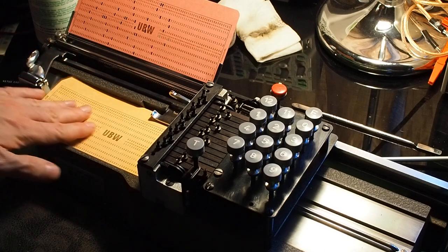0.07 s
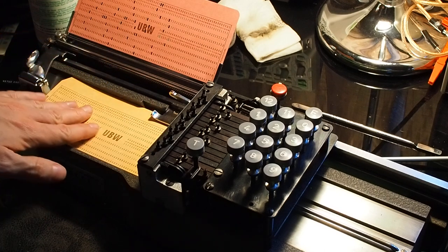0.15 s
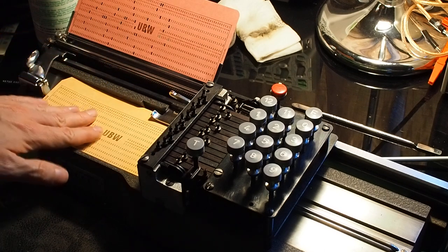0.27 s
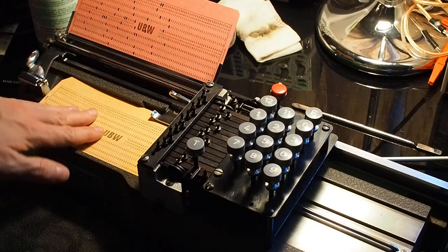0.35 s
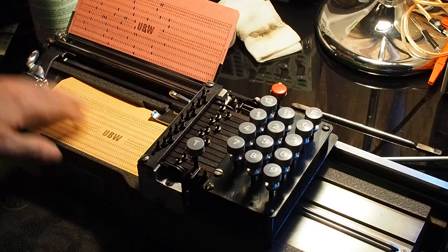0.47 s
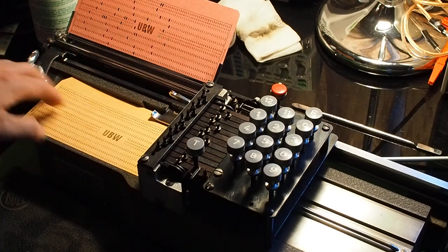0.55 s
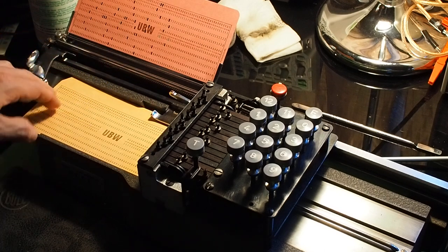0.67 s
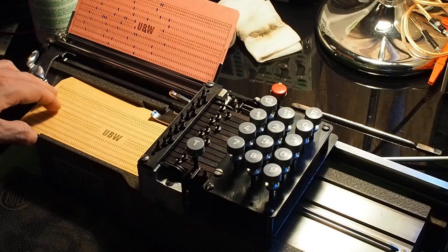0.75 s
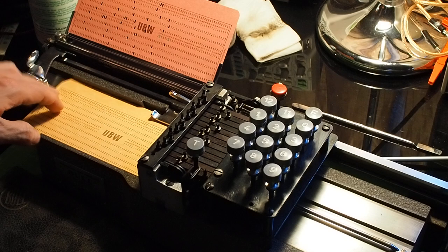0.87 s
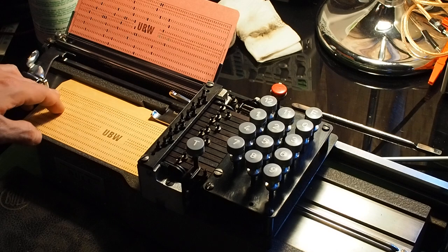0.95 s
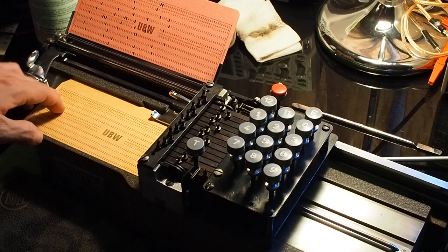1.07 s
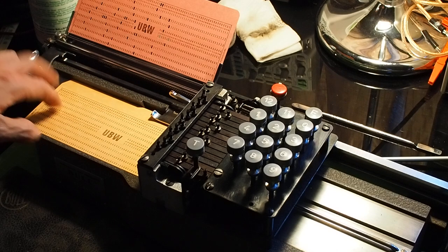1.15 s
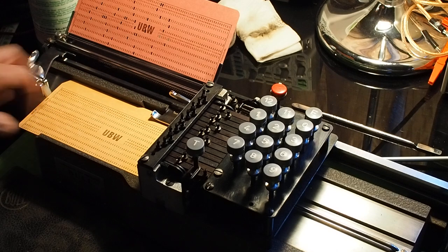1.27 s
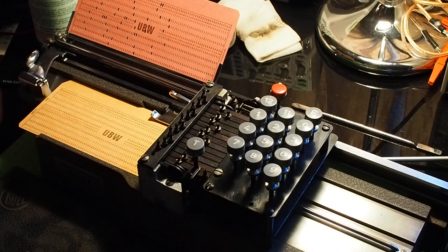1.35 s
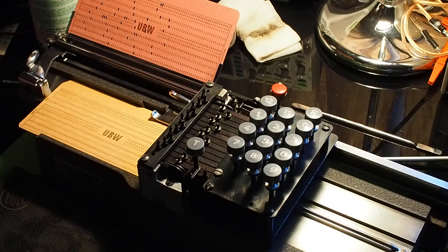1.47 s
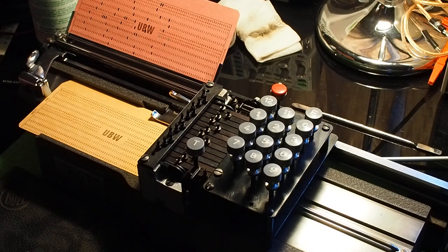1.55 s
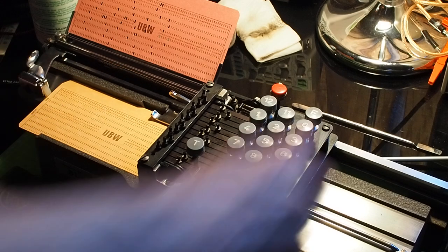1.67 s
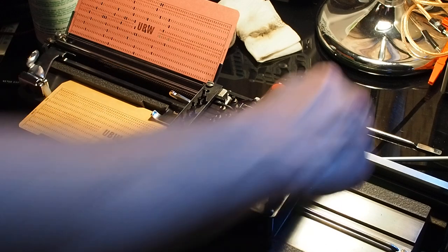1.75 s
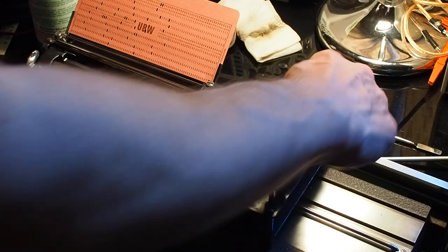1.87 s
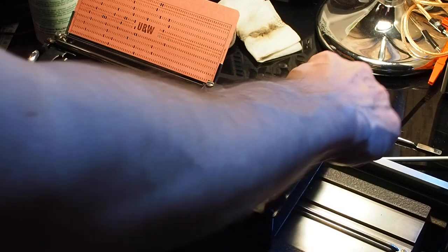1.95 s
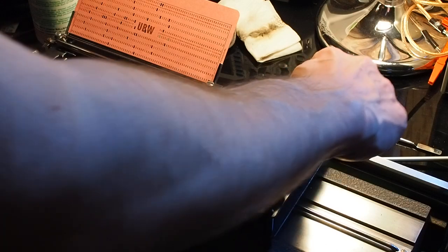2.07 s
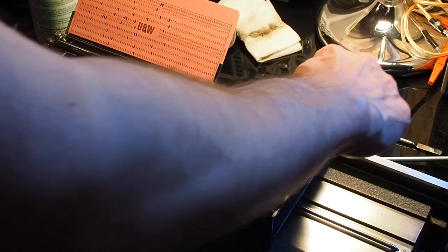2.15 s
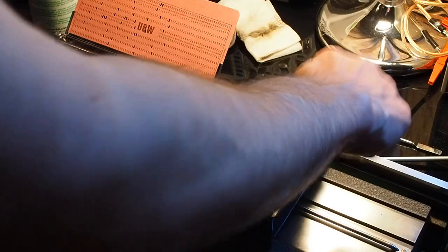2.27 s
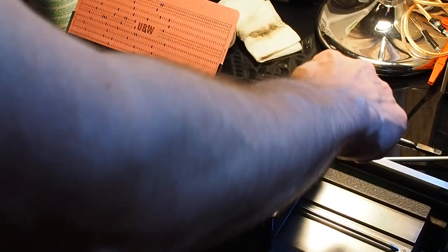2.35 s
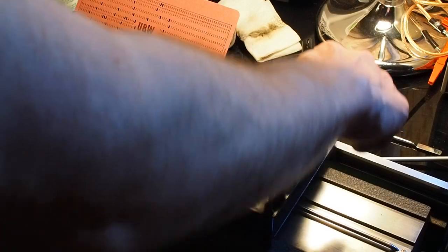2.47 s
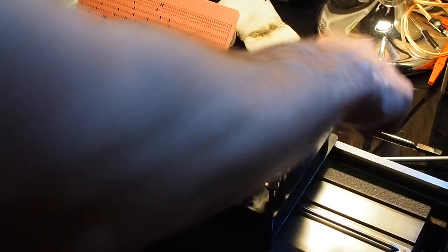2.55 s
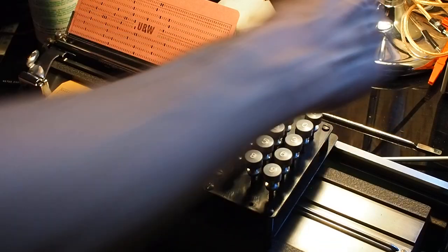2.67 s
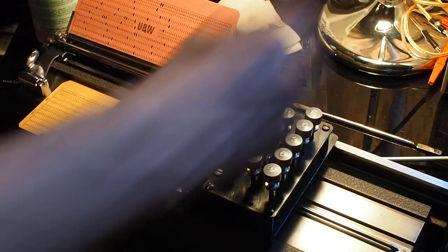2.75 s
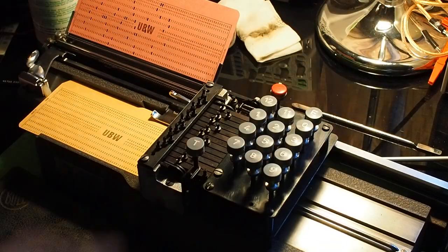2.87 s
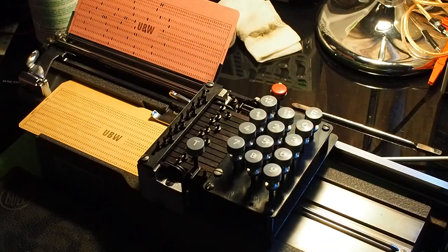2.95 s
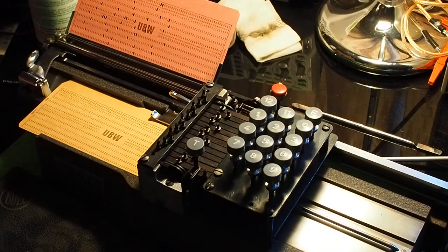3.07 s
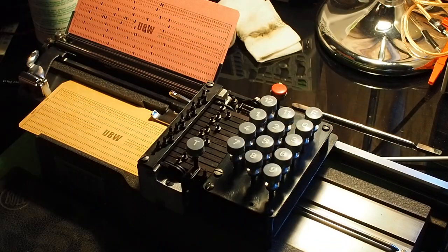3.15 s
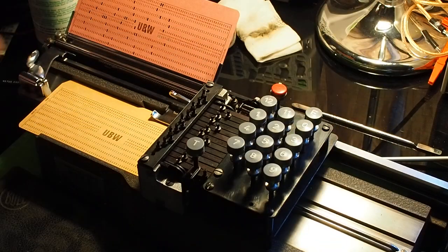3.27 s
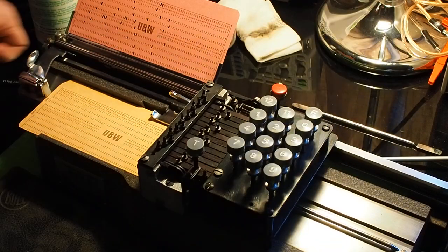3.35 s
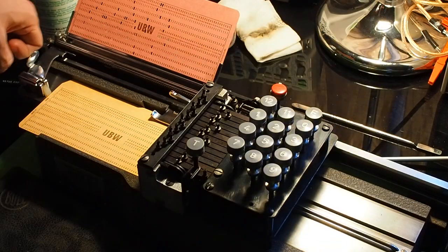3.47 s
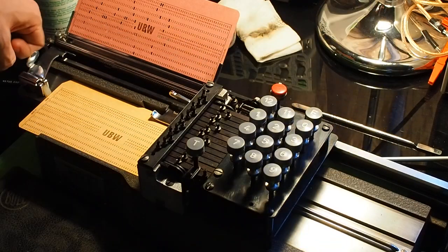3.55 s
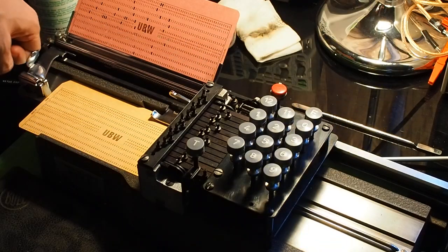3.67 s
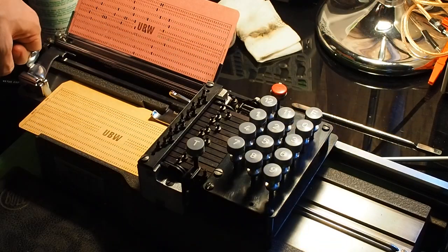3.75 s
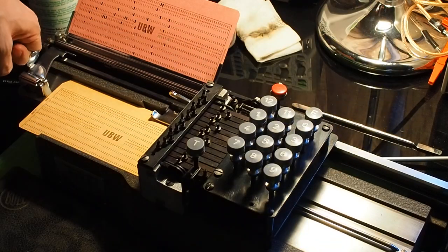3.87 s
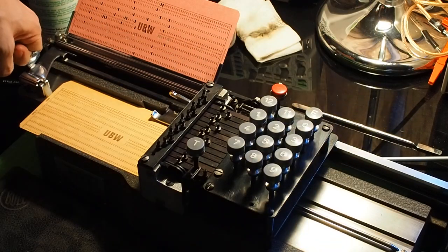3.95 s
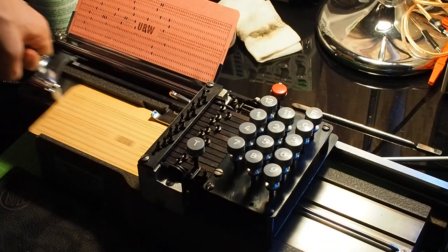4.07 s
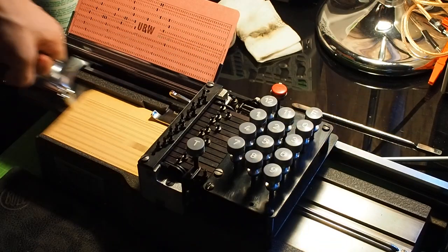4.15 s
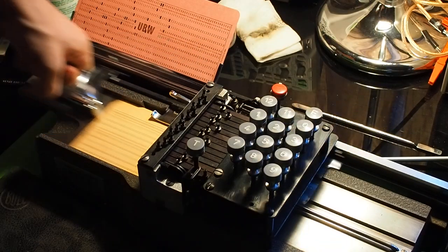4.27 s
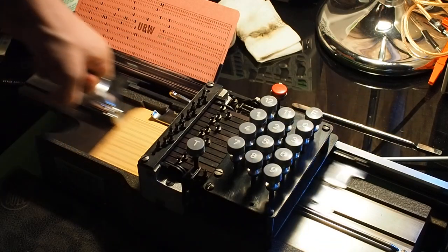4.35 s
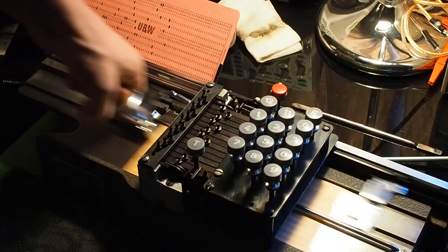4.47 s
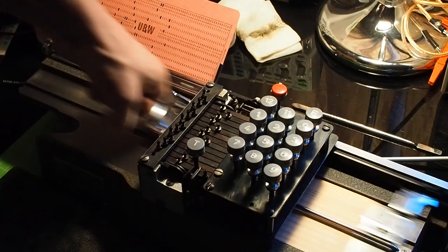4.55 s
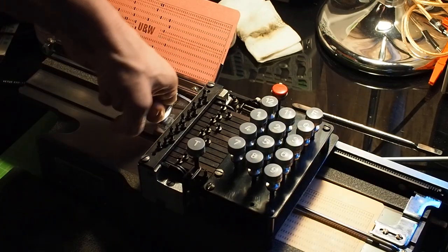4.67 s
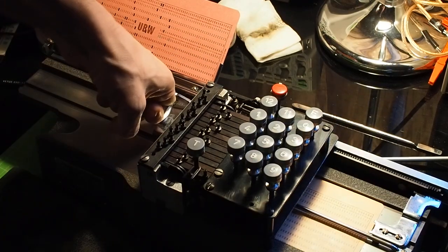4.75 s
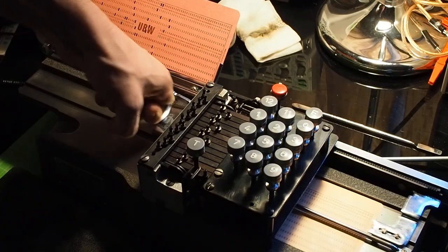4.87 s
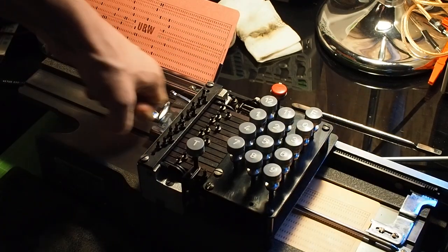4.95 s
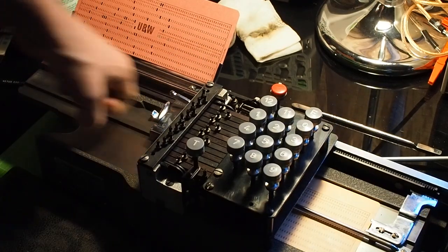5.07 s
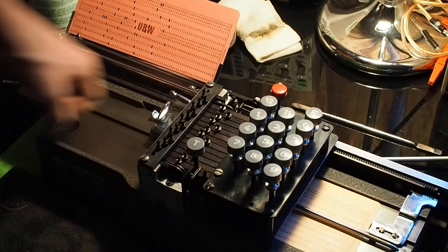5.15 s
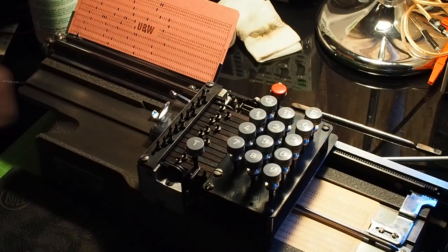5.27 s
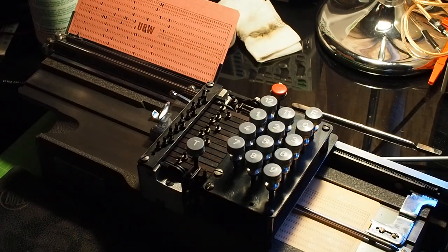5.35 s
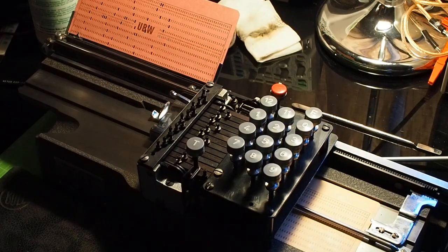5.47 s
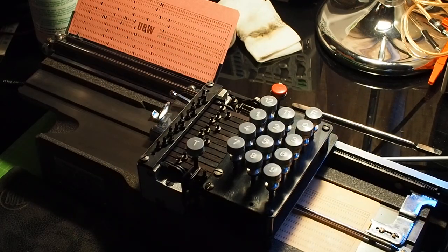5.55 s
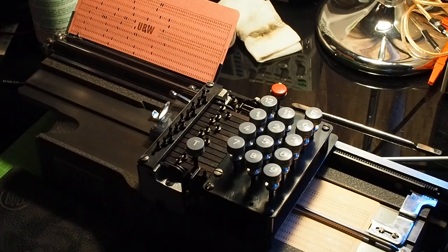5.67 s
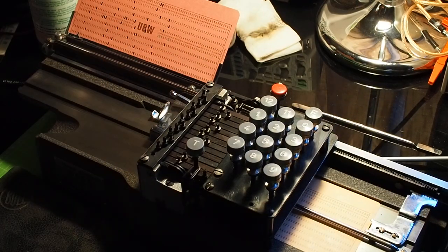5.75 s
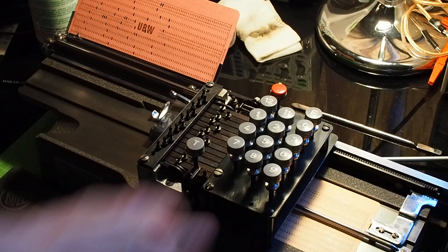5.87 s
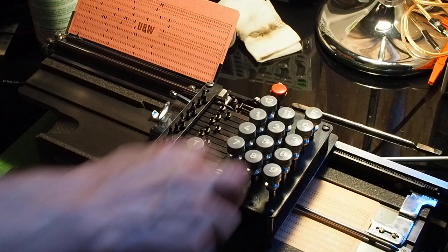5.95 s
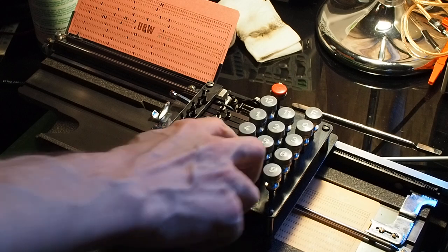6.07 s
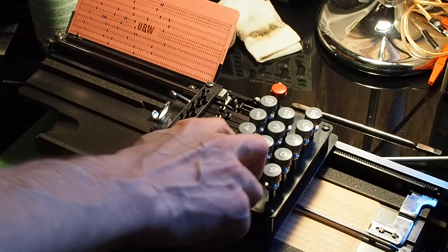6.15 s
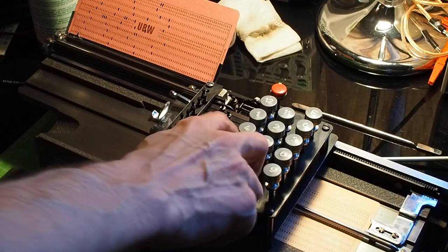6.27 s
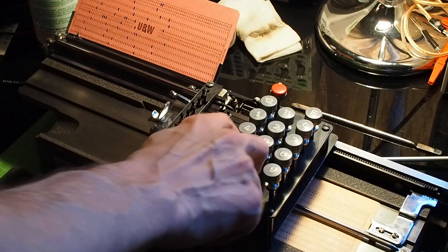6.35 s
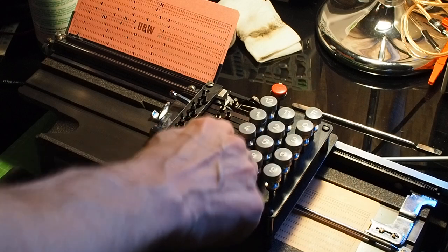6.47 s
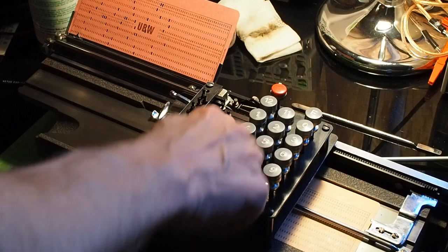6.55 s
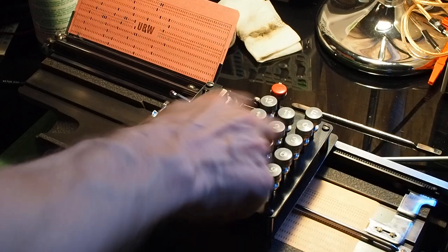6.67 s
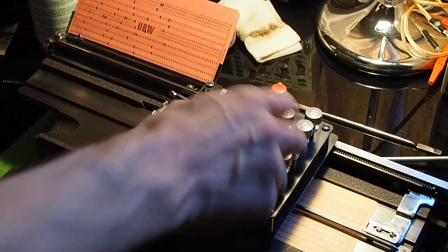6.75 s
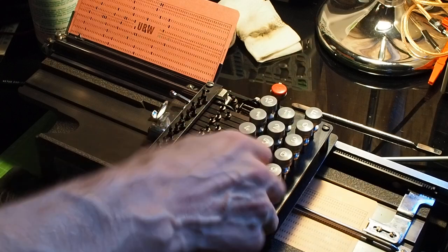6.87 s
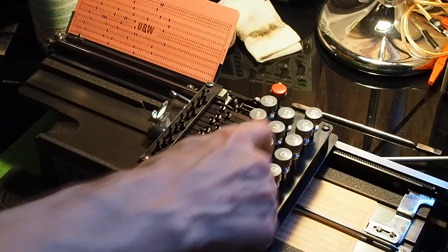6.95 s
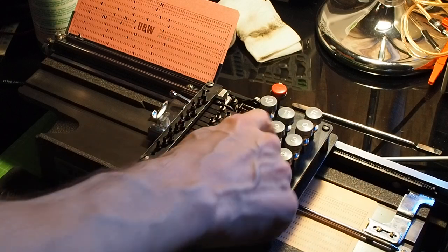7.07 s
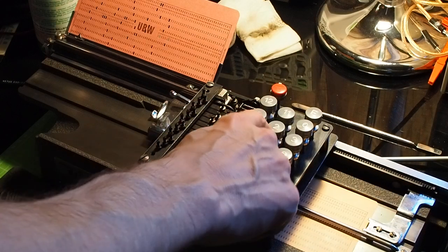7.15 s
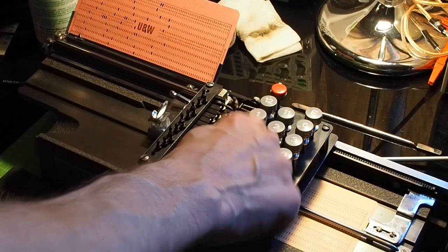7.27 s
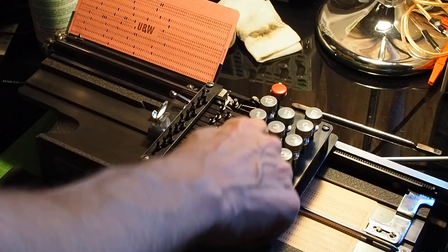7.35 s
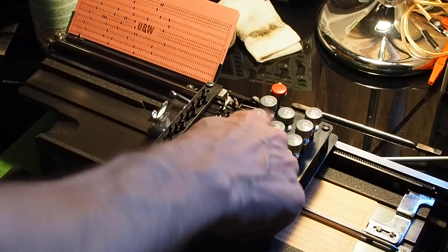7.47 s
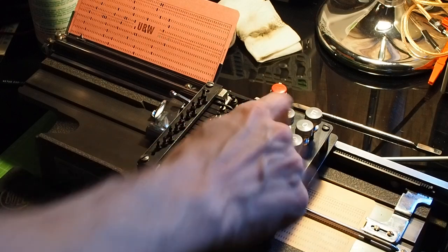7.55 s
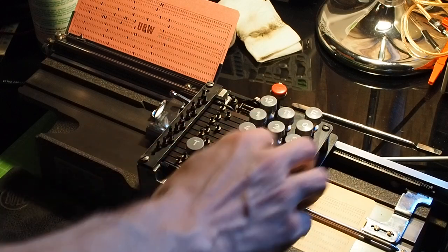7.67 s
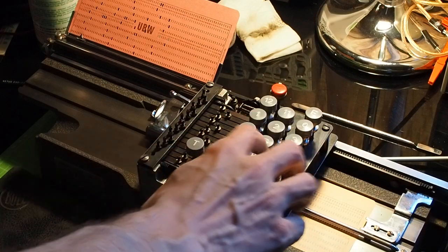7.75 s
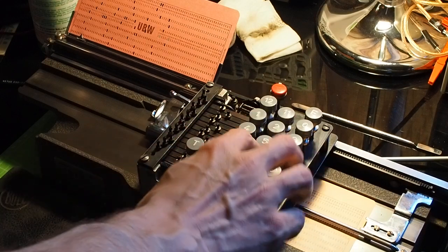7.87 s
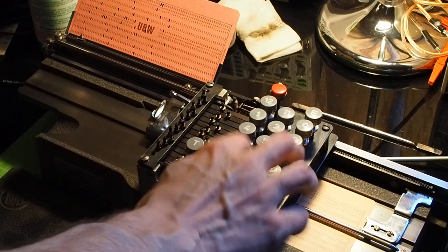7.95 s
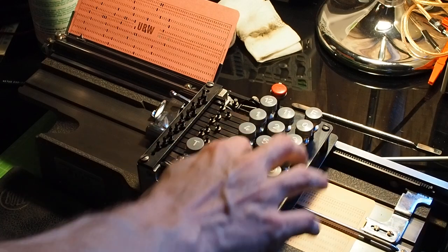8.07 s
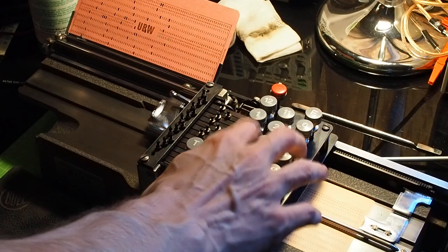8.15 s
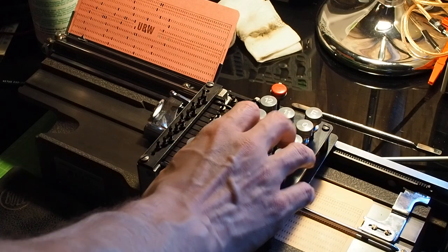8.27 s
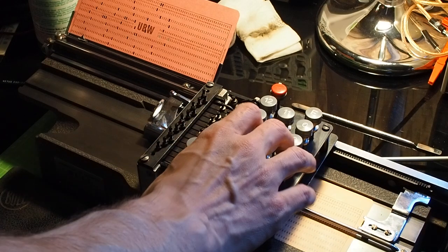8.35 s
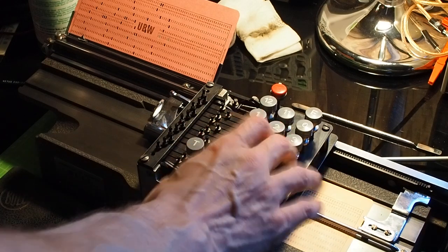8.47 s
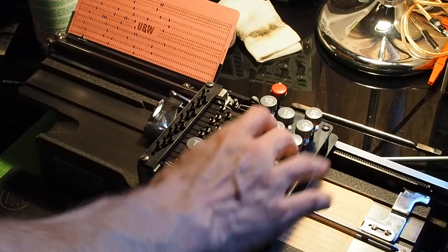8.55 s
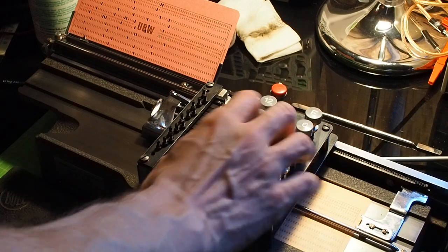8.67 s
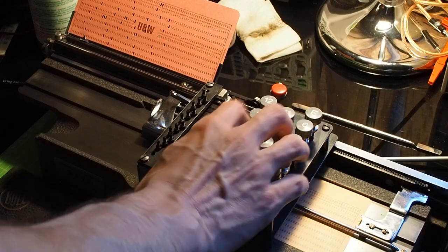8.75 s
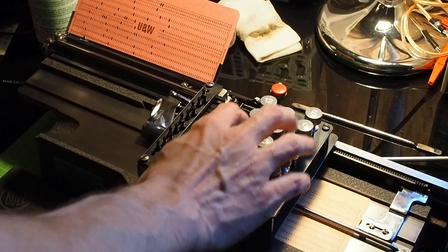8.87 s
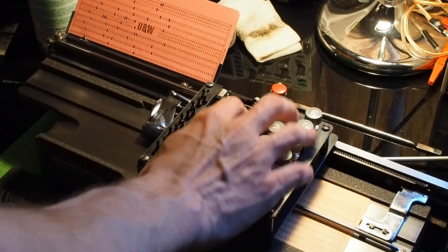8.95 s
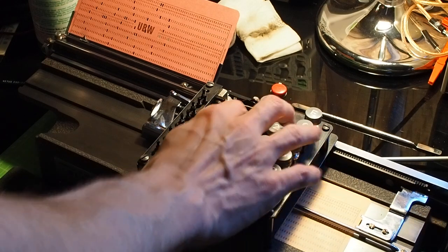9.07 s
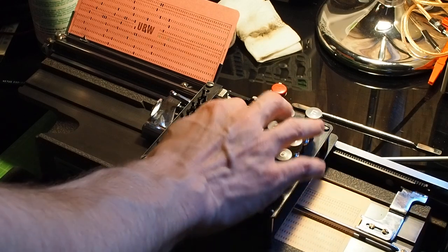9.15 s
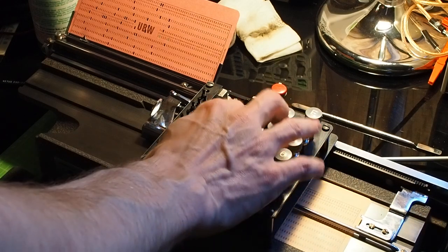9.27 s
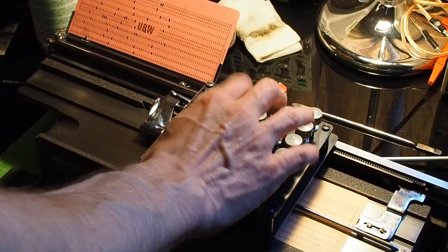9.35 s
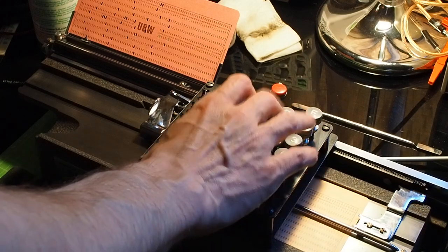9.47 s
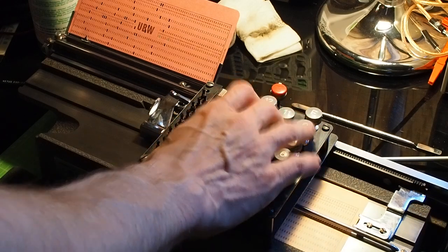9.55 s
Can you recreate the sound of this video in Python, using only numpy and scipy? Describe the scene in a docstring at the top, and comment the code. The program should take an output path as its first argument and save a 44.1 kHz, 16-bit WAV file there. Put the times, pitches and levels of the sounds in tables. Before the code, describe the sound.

A stiff card slides and snaps into a hand-operated card punch on a desk. A latch clicks sharply with a faint ping, and there are two tiny squeaks. The carriage is pushed along in a quick, accelerating ratchet and stops with a loud clack, followed by another. Then six steel keys are pressed one by one, knocking down and springing back with double clacks. The microphone is close, in a quiet room with a faint fan.

```python
"""A hand-worked card punch: steel keys go down with a knock and spring back with a double clack.
Before the keying, a card snaps into the bed and the carriage is pushed along its rack past a clicking
pawl. Each contact rings the frame, thumps the desk and shakes loose parts; return springs hum on.
A fan hums in the quiet room, and a slow gain control ducks after long loud sound."""
import sys
import numpy as np
from scipy import signal
from scipy.fft import rfft, irfft, next_fast_len
from scipy.io import wavfile
from scipy.ndimage import map_coordinates

SR = 44100
rng = np.random.default_rng(int(sys.argv[2]) if len(sys.argv) > 2 else 0)


def file_out(sig):
    """Save sig as 16-bit WAV at sys.argv[1]."""
    # one column per channel
    cols = np.atleast_2d(sig).T
    # limit, then scale
    lim = np.clip(cols, -1, 1)
    pcm = np.round(lim * 32767).astype(np.int16)
    wavfile.write(sys.argv[1], SR, pcm)


N = 423360

# keys bottoming out: start_s, level_db, clack_hz, tick_rel_db, knock_rel_db
KEY_PRESSES = [(6.4513, -12, 2840, 1.5, -12), (7.3215, -12.5, 2440, -5.5, -8.5),
               (8.0057, -6.5, 2450, -17, -21.5), (8.481, -10.5, 1830, -5, -9),
               (9.1161, -7, 2340, -4.5, -16), (9.594, -8, 1750, -10, -18)]
# keys springing back: start_s, first_db, first_hz, gap_s, second_db, spring_db
KEY_RELEASES = [(6.6859, -7, 3430, 0.0098, -2, -41.5), (7.517, -6.5, 3250, 0.0086, -2.5, -52.5),
                (8.1724, -11.5, 2685, 0.0079, -0.5, -42.5), (8.628, -8, 2700, 0.0095, -3, -53),
                (9.333, -5, 4260, 0.0098, -2, -41.5)]
# parts rebounding: start_s, level_db
BOUNCES = [(4.9236, -17), (6.4594, -17.5), (6.4708, -24), (8.0129, -14), (8.169, -18.5), (8.189, -10),
           (8.6325, -12.5)]
# linkage taking up slack: start_s, level_db
SLACK_TICKS = [(2.2462, -28.5), (2.256, -26.5), (2.5688, -28), (4.848, -40.5), (4.881, -38.5),
               (4.9096, -26), (6.3376, -34), (6.4153, -27.5), (6.6608, -30), (6.671, -27), (7.273, -32.5),
               (7.2927, -23.5), (7.3125, -23), (7.497, -34), (7.9548, -30), (7.975, -28.5), (8.151, -35),
               (8.4438, -27.5), (8.603, -31), (8.609, -26), (9.0306, -30), (9.038, -26), (9.0545, -33),
               (9.3146, -30.5), (9.5367, -31), (9.5582, -30.5)]
# latch, lever, carriage stops: start_s, level_db, clack_hz, tick_rel_db, knock_rel_db, rattle_rel_db
STOPS = [(2.282, -16, 3700, 1.5, -34, -8), (2.2987, -14, 3870, 7.5, -21.5, -6),
         (2.585, -4, 4270, 0.5, -25.5, -10.5), (3.9722, -15, 3970, -1, -50, -24),
         (4.5963, 2.5, 3700, -1, -35.5, -24), (4.918, -4, 3200, -6.5, -23.5, -6)]


def strokes():
    """Every steel-on-steel hit, in the columns of STOPS; stops last."""
    second_hz, bounce_hz, slack_hz = 2990, 2880, 3100
    presses = [(*row, -15) for row in KEY_PRESSES]
    firsts = [(*row[:3], -3.5, -25, -10.5) for row in KEY_RELEASES]
    seconds = [(s + gap_s, db, second_hz, -7.5, -31, -8.5) for s, _, _, gap_s, db, _ in KEY_RELEASES]
    bounces = [(*row, bounce_hz, -0.5, -17.5, -13) for row in BOUNCES]
    slack = [(*row, slack_hz, -9, -19.5, -7.5) for row in SLACK_TICKS]
    return presses + firsts + seconds + bounces + slack + STOPS


# cast frame and levers: pitch_hz, level_db, base_t60_s
STEEL_MODES = [(837, -6.5, 0.2), (1378, -12.5, 0.9), (1867, -8.5, 0.73), (2154, 0.5, 0.18),
               (2657, -2, 0.28), (2904, 0.5, 0.27), (3050, -2.5, 0.081), (3700, 3, 0.083), (3630, -15, 0.3),
               (4080, -1, 0.047), (4260, -12, 0.17), (5480, -5, 0.3), (5780, 1, 0.095), (5770, 4.5, 0.21)]
# desk top and hollow base: pitch_hz, level_db, base_t60_s
DESK_MODES = [(71.5, -18, 0.13), (125.6, 0.5, 0.14), (187.3, 3.5, 0.14), (339, -1.5, 0.06),
              (557, 1.5, 0.046), (860, 1, 0.018), (1220, -4.5, 0.0083), (2220, -47, 0.014)]
# loose parts: freq_hz, density_db
RATTLE_SPECTRUM = [(150, -23), (600, -7), (1200, -9), (1900, 0.5), (2400, -7.5), (3100, -1.5), (3700, -9.5),
                   (4700, -6.5), (5550, -3.5), (6300, -7), (8500, -10), (12200, -15), (16000, -35)]


def contacts():
    """Each hit gives a clack, a bright tick, a knock in the desk and a rattle of loose parts."""
    hits = strokes()
    clacks, t = np.zeros(N + SR), np.arange(SR // 20) / SR
    attack = 1 - np.exp(-t / 0.0005)
    for s, db, clack_hz, *_ in hits:
        modes = attack * ring(STEEL_MODES, t, spread_db=4, t60_scale=0.1, centre_hz=clack_hz)
        add(clacks, s, amp(db + 3) * (0.5 * modes + crack(t, clack_hz, 2340, t60_s=0.025)))
    clacks = filtered(clacks[:N], lambda hz: 1 - 0.62 * band(hz, 4570, 800))  # frame radiates less here
    start_s, level_db, _, tick_db, knock_db, rattle_db = np.transpose(hits)
    tick = fading(start_s, level_db + tick_db - 4.5, t60_s=0.041)
    tick = tick * noise(lambda hz: band(hz, 11500, 7400) ** 2)
    thud = fading(start_s - 0.001, level_db + knock_db + 6, t60_s=0.043)
    thud *= 0.22 + rng.standard_normal(N)  # one-way push plus grit
    knock = amp(12.5) * filtered(thud, resonances(DESK_MODES, t60_scale=0.75))
    # a short rattling swell leads into every hit except the stops, louder before harder knocks
    led = slice(-len(STOPS))
    lead_in = fading(N / SR - start_s[led], (level_db + knock_db)[led] + 5, t60_s=0.036)[::-1]
    shake = np.hypot(fading(start_s + 0.00052, level_db + rattle_db - 2, t60_s=0.16), lead_in)
    loose = flutter(rate_hz=360, depth_db=3.5) * noise(lambda hz: amp(along(RATTLE_SPECTRUM, hz)))
    frame = amp(2) * filtered(shake * rng.standard_normal(N), resonances(STEEL_MODES, t60_scale=0.2))
    return clacks + tick + knock + shake * loose + frame


# return springs: pitch_hz, level_db, base_t60_s
SPRING_MODES = [(254, -3, 4.5), (382, 2, 1.33)]


def springs_and_latch():
    """A released key leaves two long springs humming; the release latch pings once."""
    out, t = np.zeros(N + 2 * SR), np.arange(2 * SR) / SR
    for s, _, _, gap_s, _, spring_db in KEY_RELEASES:
        add(out, s + gap_s, amp(spring_db) * ring(SPRING_MODES, t, spread_db=0.5, t60_scale=0.9))
    latch_s, latch_hz, latch_db, latch_t60_s = 2.586, 3745, -36.5, 0.5525
    add(out, latch_s, amp(latch_db) * ring([(latch_hz, 0, latch_t60_s)], t, spread_db=0, t60_scale=1))
    return out[:N]


# pawl's bright tick along the rack: time_s, level_db, top_band_power_share
RACK_TICK = [(4.022, -22, .2), (4.12, -17, 0.6), (4.22, -23.5, .4), (4.3, -9, 0.01), (4.4, -14.5, 0),
             (4.46, -14.5, 0.26), (4.52, -19.5, 0.3), (4.57, -14, .07)]
# pawl, two ring bands then two tick bands: centre_hz, width_hz
PAWL_BANDS = [(8850, 4100), (6360, 4200), (11370, 4200), (14300, 2500)]
# carriage sliding: freq_hz, density_db
SLIDE_SPECTRUM = [(47, -48), (80, -39), (124, -8), (236, -24), (426, -8.5), (1230, -12), (2060, -2),
                  (2440, -8.5), (2690, -4), (7500, -12), (9750, -18), (16500, -120)]


def carriage():
    """The pawl drops off each rack tooth and shakes the frame, faster as the carriage gains speed."""
    push_s, stop_s, gather_s = 4.0215, 4.592, 0.15
    start_rate_hz, top_rate_hz = 46, 152
    fade_s, fade_db_per_s, sink_span_s = 4.396, -62, (3.73, 4.56)  # pawl ring
    t = np.arange(0, stop_s - push_s, 1 / SR)
    lag = np.exp(-t / gather_s)
    teeth_passed = np.cumsum(top_rate_hz - (top_rate_hz - start_rate_hz) * lag) / SR
    tooth = np.arange(int(teeth_passed[-1]) + 1)
    scatter = rng.standard_normal((len(tooth), 6))
    slowness = np.interp(tooth, teeth_passed, lag)
    jitter_s = 0.0006 * scatter[:, 0] * (slowness < 0.5)
    drops_s = push_s + np.interp(tooth, teeth_passed, t) + jitter_s
    frame_db = -21 - 6 * slowness
    steel = resonances(STEEL_MODES, t60_scale=0.12)
    slide = noise(lambda hz: amp(along(SLIDE_SPECTRUM, hz)) * (2.3 + np.abs(steel(hz))))
    out = slide * fading(drops_s, frame_db + 0.72 * scatter[:, 1], t60_s=0.11)
    time_s, tick_db, top_share = np.transpose(RACK_TICK)
    tick_db = np.interp(drops_s, time_s, tick_db)
    top_share = np.clip(np.interp(drops_s, time_s, top_share), 0.001, 0.999)
    ring_db = frame_db + 4.5 + fade_db_per_s * np.maximum(drops_s - fade_s, 0)
    low_share = np.interp(drops_s, sink_span_s, [0.15, 0.8])
    bands_db = [ring_db + 10 * np.log10(1 - low_share), ring_db + 10 * np.log10(low_share),
                tick_db + 10 * np.log10(1 - top_share), tick_db + 10 * np.log10(top_share)]
    for k, (centre_hz, width_hz) in enumerate(PAWL_BANDS):
        envelope = fading(drops_s, bands_db[k] + 1.5 * scatter[:, 2 + k], t60_s=0.024)
        out += envelope * noise(lambda hz: band(hz, centre_hz, width_hz) ** 3)
    return out


# card edge: start_s, level_db, pitch_hz
CARD_SNAPS = [(.0495, -17.5, 3300), (0.0704, -18, 3500), (0.887, -10.5, 4060), (0.8925, -22, 3970)]


def card():
    """The card's edge snaps against the bed and buzzes briefly."""
    out, t = np.zeros(N), np.arange(SR // 8) / SR
    for s, db, pitch_hz in CARD_SNAPS:
        snap = crack(t, pitch_hz, 2350, t60_s=0.012)
        buzz = 0.094 * crack(t, pitch_hz, 4000, t60_s=0.06)
        body = 0.065 * crack(t, 1100, 1800, t60_s=0.022)
        add(out, s, amp(db) * (snap + buzz + body))
    return out


# card sliding: start_s, length_s, level_db, low_rel_db
CARD_RUBS = [(0, 0.067, -34.5, -18), (0.044, 0.014, -36, -2.5), (0.06, 0.032, -35, -5),
             (.251, 0.018, -41.5, -27), (.4, 0.022, -52, -32), (.588, .004, -51, -30),
             (.645, .015, -56, -30)]
# hands brushing: start_s, length_s, level_db, low_rel_db
HAND_RUBS = [(1.932, .02, -61, 11), (3.01, 0.067, -47, -10), (3.715, 0.036, -57, 6.5),
             (5.4, 0.19, -51, -10), (5.7, 0.059, -53, 2), (5.85, 0.081, -59, 2)]
# key stems scraping: start_s, length_s, level_db, pitch_hz
STEM_RUBS = [(2.553, 0.022, -38.5, 1900), (6.391, 0.067, -40.5, 2900), (7.475, 0.038, -37, 3900),
             (8.136, 0.028, -35, 3830), (8.422, 0.028, -39, 2460)]
# squeaks: start_s, length_s, level_db, first_hz, last_hz
SQUEAKS = [(3.411, 0.091, -36.5, 2900, 3400), (3.515, .054, -34, 2880, 2320)]


def rubbing():
    """Card, skin and key stems scrape in fine grains through a resonance that glides in the squeaks."""
    card_hz, hand_hz = 3500, 2770
    rubs = [(*row[:3], card_hz, card_hz, row[3], -27) for row in CARD_RUBS]
    rubs += [(*row[:3], hand_hz, hand_hz, row[3], -4.5) for row in HAND_RUBS]
    rubs += [(*row, row[-1], -14, -36) for row in STEM_RUBS]
    rubs += [(*row, -13.5, -36) for row in SQUEAKS]
    grains = noise(lambda hz: 1) * flutter(rate_hz=200, depth_db=3)
    hz, t, spectra = signal.stft(grains, SR, nperseg=256)
    hz, gain = hz[:, None], np.zeros(spectra.shape[1:])
    for start_s, length_s, db, first_hz, last_hz, low_db, air_db in rubs:
        end_s = start_s + length_s
        pitch_hz = np.interp(t, [start_s, end_s], [first_hz, last_hz])
        envelope = np.interp(t, [start_s - 0.006, start_s, end_s, end_s + 0.014], [0, 0.9, 0.6, 0])
        squeak = 1.08 * np.abs(band(hz, pitch_hz, 650)) ** 2
        scrape = 0.25 * np.abs(band(hz, 4950, 1880))
        low = amp(low_db + 4) * np.abs(band(hz, 730, 920)) ** 2
        air = amp(air_db) * np.abs(band(hz, 10800, 7500)) ** 2
        gain += amp(db + 10) * (squeak + scrape + low + air) * envelope
    return signal.istft(spectra * gain, SR, nperseg=256)[1][:, :N]


# room decay: freq_hz, t60_s
ROOM_DECAY = [(100, 0.62), (700, 0.4), (2000, 0.32), (5000, 0.32), (13000, 0.22)]


def reverb(x):
    """Room reflections: lows outlast highs; each quarter second gets a new random tail."""
    out, step, delay_samples = np.zeros((2, N + SR)), SR // 4, 200
    for start in range(0, N, step):
        hz, t, (mid, side) = signal.stft(rng.standard_normal((2, SR // 3)), SR, nperseg=256)
        side = side * np.clip(hz / 4000, 0.3, 1)[:, None]  # long waves reach both ports alike
        decay = amp(-60 * t / along(ROOM_DECAY, hz)[:, None])
        tail = signal.istft(np.array([mid + side, mid - side]) * decay, SR, nperseg=256)[1]
        wet = signal.fftconvolve(x[:, start:start + step], tail / np.linalg.norm(tail[0]), axes=1)
        out[:, start + delay_samples:][:, :wet.shape[1]] += wet
    return out[:, :N]


# fan duct: centre_hz, width_hz, level_db
FAN_BANDS = [(471.3, 19.3, 10.5), (1044, 96, 3), (1435, 180, 0), (1935, 115, -4)]
# room hush: freq_hz, density_db
HUSH_SPECTRUM = [(20, -21), (40, -8), (135, -7), (236, -13.5), (312, -14.5), (349, -15), (462, -13),
                 (832, -20), (1040, -20.5), (1680, -22.5), (5900, -24), (7500, -27.5), (14900, -32),
                 (16200, -52)]
# room hush, left to right: freq_hz, coherence
HUSH_COHERENCE = [(60, 0.51), (380, 0.33), (2380, 0.043), (15000, 0.013)]


def fan_and_hush():
    """A fan's narrow duct resonances drift in level over a broad hush."""
    hush = noise(lambda hz: amp(along(HUSH_SPECTRUM, hz)), HUSH_COHERENCE)
    duct = lambda hz: sum(amp(db) * band(hz, centre, width) ** 2 for centre, width, db in FAN_BANDS)
    fan = noise(duct, coherence=[(400, 0.98), (2000, 0.9)]) * flutter(rate_hz=4, depth_db=1)
    return amp(-50.5) * hush + amp(-58) * fan


# close sources, left to right: freq_hz, coherence
NEAR_COHERENCE = [(60, 0.66), (180, 1), (550, 1), (1650, 0.86), (4970, 0.38), (15000, 0.053)]


def noise(response, coherence=NEAR_COHERENCE):
    """Coloured stereo noise, rms 1."""
    def mid_side(hz):
        angle = np.arccos(np.clip(along(coherence, hz), -1, 1)) / 2
        return response(hz) * np.array([np.cos(angle), np.sin(angle)])
    mid, side = filtered(rng.standard_normal((2, N)), mid_side)
    return unit_rms(np.array([mid + side, mid - side]))


def ring(modes, t, spread_db, t60_scale, centre_hz=None):
    """Modes struck at random strengths and phases; centre_hz favours the part that was hit."""
    hz, db, t60_s = np.transpose(modes)[..., None]
    scatter, phase = rng.standard_normal((2, len(modes), 1))
    emphasis = 0.32 + np.abs(band(hz, centre_hz, 1200)) if centre_hz else 1
    strength = amp(db + spread_db * scatter) * emphasis
    decay = amp(-60 * t / (t60_scale * t60_s))
    partials = strength * decay * np.sin(2 * np.pi * hz * t + phase)
    return partials.sum(axis=0) / np.linalg.norm(strength)


def resonances(modes, t60_scale):
    """Frequency response of modes; faster decay, wider peak."""
    return lambda hz: sum(
        (-1) ** k * amp(db) * band(hz, pitch_hz, np.log(1000) / (np.pi * t60_scale * t60_s))
        for k, (pitch_hz, db, t60_s) in enumerate(modes))


def crack(t, centre_hz, width_hz, t60_s):
    """Noise burst around one pitch, peak 1."""
    burst = amp(-60 * t / t60_s) * rng.standard_normal(len(t))
    burst = filtered(burst, lambda hz: band(hz, centre_hz, width_hz) ** 2)
    return burst / np.abs(burst).max()


def fading(starts_s, levels_db, t60_s):
    """Rms envelope that jumps at each start and dies away."""
    starts = np.clip(np.round(starts_s * SR).astype(int), 0, N - 1)
    power = np.bincount(starts, amp(2 * levels_db), N)
    return np.sqrt(signal.lfilter([1], [1, -amp(-2 * 60 / (t60_s * SR))], power))


def flutter(rate_hz, depth_db):
    """Random gain, rms 1."""
    knots = rng.standard_normal(int(N * rate_hz / SR) + 4)
    return unit_rms(amp(depth_db * map_coordinates(knots, [np.arange(N) * rate_hz / SR], order=1)))


def band(hz, centre_hz, width_hz):
    """Causal resonance, peak gain 1."""
    return 1j * hz * width_hz / (centre_hz ** 2 - hz ** 2 + 1j * hz * width_hz)


def filtered(x, response):
    size = next_fast_len(x.shape[-1] + 4096)
    return irfft(rfft(x, size) * response(np.fft.rfftfreq(size, 1 / SR)), size)[..., :x.shape[-1]]


def along(points, hz):
    """Interpolate on a log frequency axis."""
    freq_hz, values = np.transpose(points)
    return np.interp(np.log(hz + 1), np.log(freq_hz + 1), values)


def add(out, start_s, sound):
    out[round(start_s * SR):][:len(sound)] += sound


def amp(db):
    return 10 ** (np.asarray(db) / 20)


def unit_rms(x):
    return x / np.sqrt(np.mean(x ** 2) + 1e-20)


# punch's stereo balance: freq_hz, left_minus_right_db
BALANCE = [(60, -0.5), (380, 2.5), (2380, 0.5), (15000, 2.5)]


def scene():
    """The punch, close and slightly left, over the room's background."""
    punch = contacts() + card() + carriage() + rubbing()
    punch = punch + amp(-6.5) * reverb(punch) + springs_and_latch()
    placed = filtered(punch, lambda hz: amp(along(BALANCE, hz) * [[0.5], [-0.5]]))
    return placed + fan_and_hush()


# microphone housing: centre_hz, width_hz, gain_db
HOUSING_DIPS = [(6590, 880, -7), (10350, 2600, -13)]


def record(dry):
    """Housing dips, bass roll-off, slow gain control, soft ceiling, band limit."""
    bass_hz, top_hz, ceiling = 40, 16200, 0.91
    hold_s, cap_db, knee_db = 0.35, -20, -28
    dips = lambda hz: np.prod(
        [1 - (1 - amp(db)) * band(hz, centre, width) for centre, width, db in HOUSING_DIPS], axis=0)
    x = filtered(dry, lambda hz: dips(hz) * 1j * hz / (bass_hz + 1j * hz))
    power = np.minimum(np.mean(x ** 2, axis=0), amp(2 * cap_db))
    pole = np.exp(-1 / (hold_s * SR))
    slow_power = signal.lfilter([1 - pole], [1, -pole], power)
    x = x * (1 + slow_power / amp(2 * knee_db)) ** -0.4
    x = x / (1 + np.abs(x / ceiling) ** 6) ** (1 / 6)
    return filtered(x, lambda hz: np.clip((top_hz - hz) / 400, 0, 1))


dry = scene()
out = record(dry)
file_out(out)
```